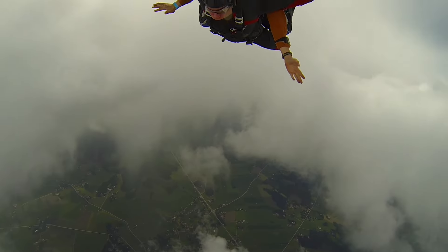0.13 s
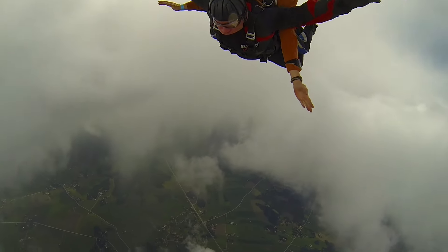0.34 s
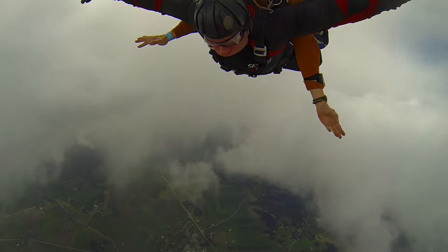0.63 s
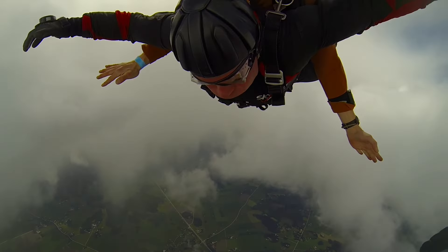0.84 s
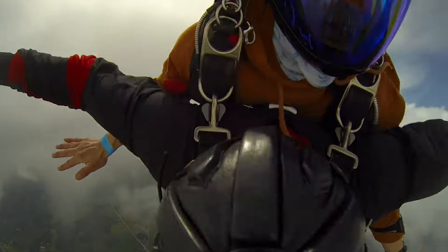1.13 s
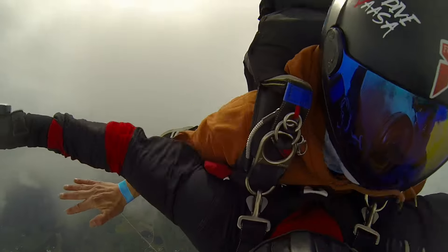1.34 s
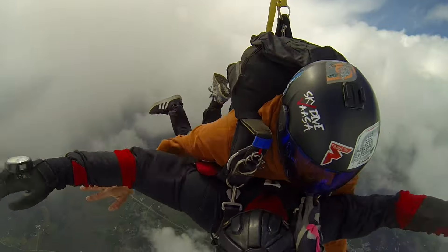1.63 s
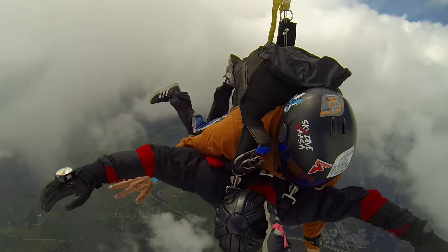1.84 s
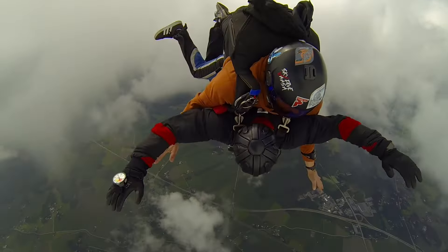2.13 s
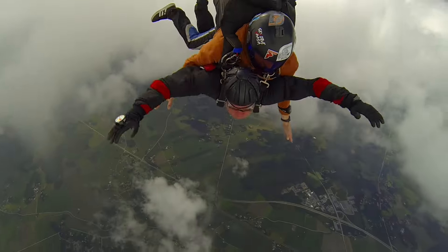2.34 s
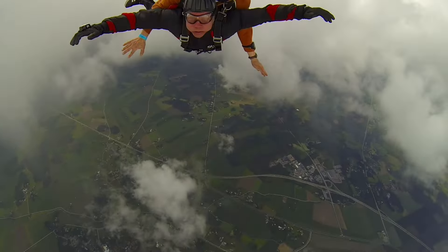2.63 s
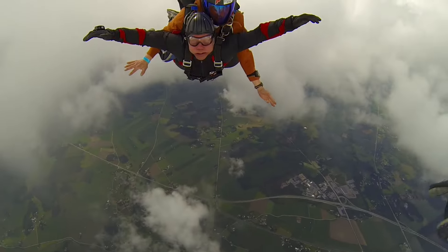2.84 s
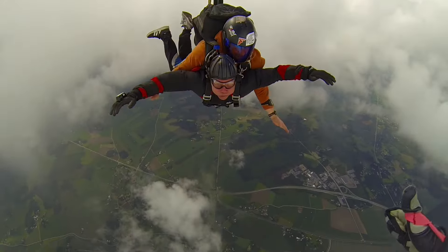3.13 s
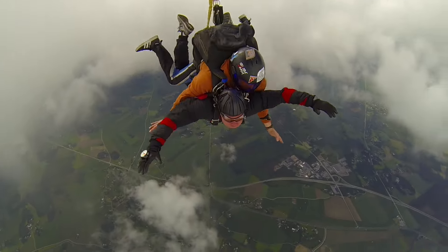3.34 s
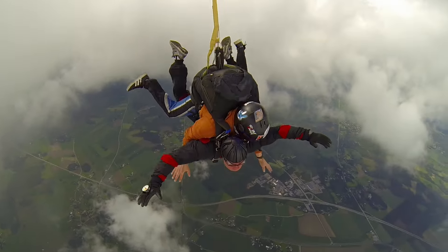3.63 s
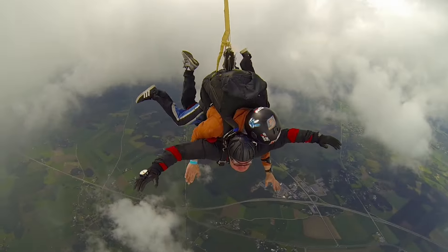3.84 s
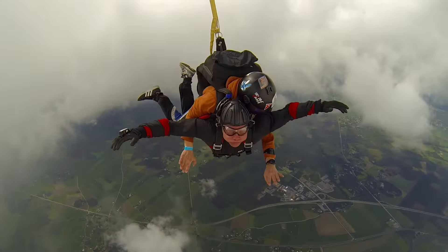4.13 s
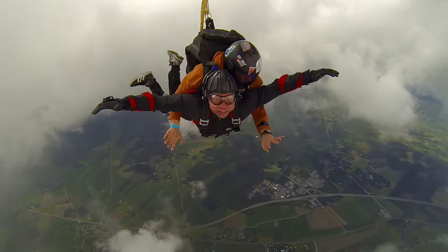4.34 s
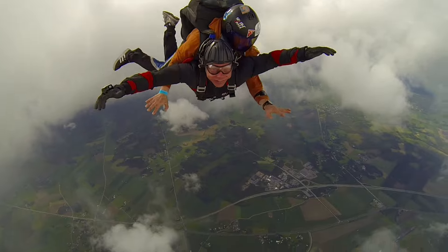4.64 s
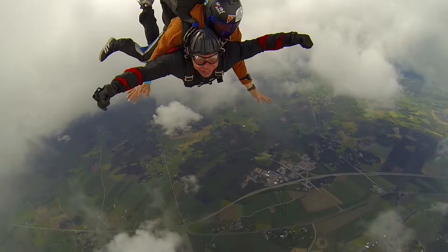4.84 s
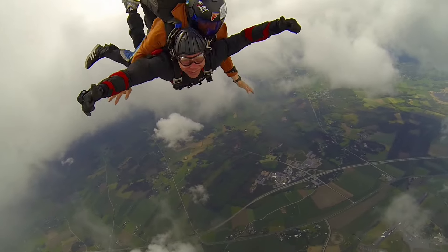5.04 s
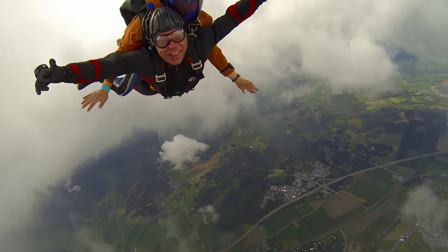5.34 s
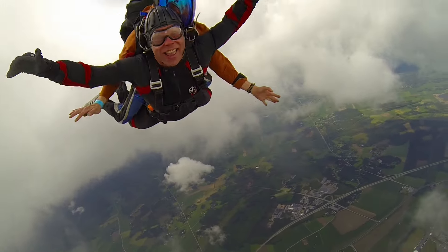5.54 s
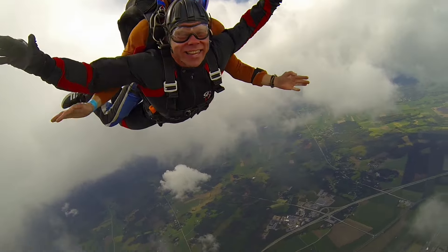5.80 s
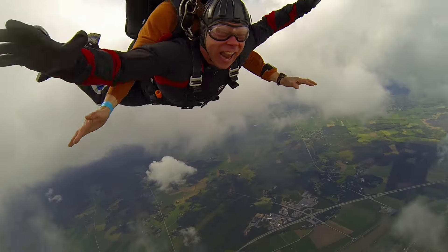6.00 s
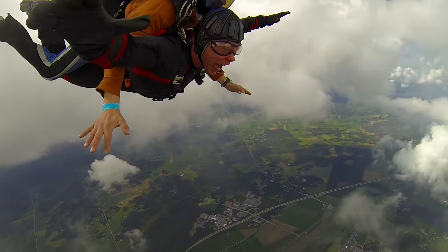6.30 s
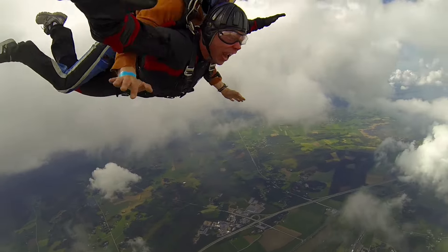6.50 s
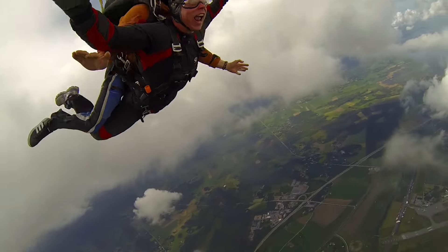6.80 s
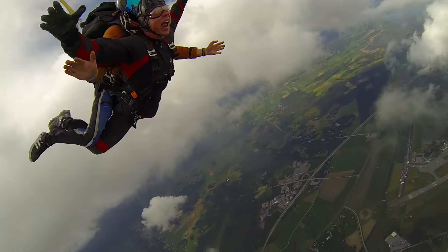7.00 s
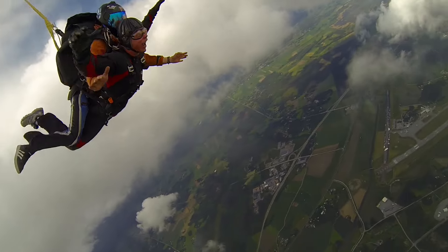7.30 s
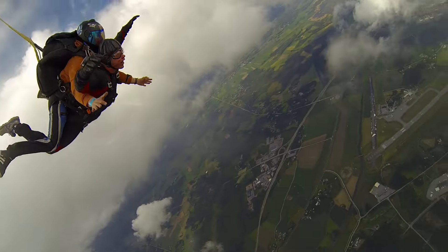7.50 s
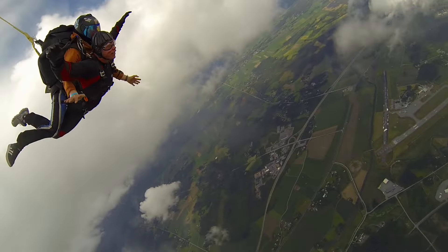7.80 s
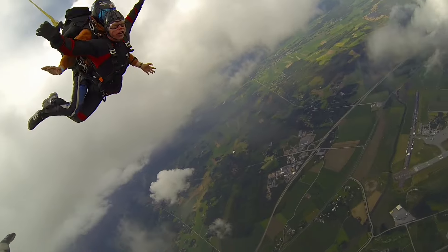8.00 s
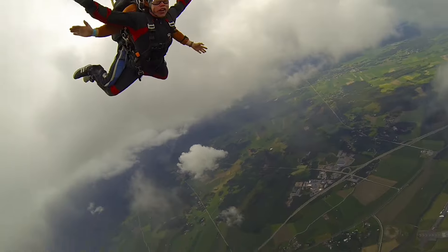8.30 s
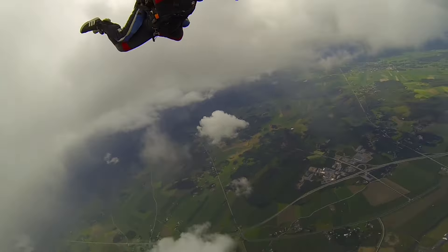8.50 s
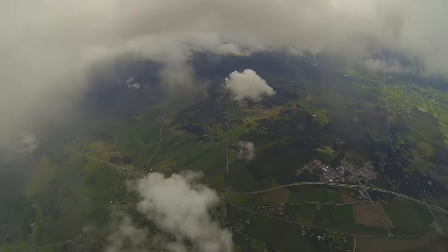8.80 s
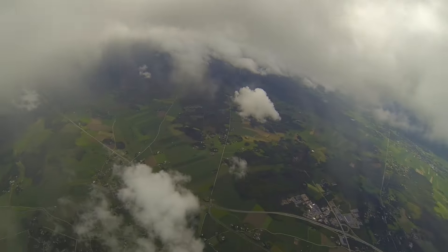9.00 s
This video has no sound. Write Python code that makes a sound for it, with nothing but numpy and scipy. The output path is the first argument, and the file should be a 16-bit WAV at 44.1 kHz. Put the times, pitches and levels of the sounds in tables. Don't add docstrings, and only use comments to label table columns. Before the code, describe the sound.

Loud, unbroken freefall wind roars over a small cased helmet camera, with low buffeting booms, a breathy mid-pitched howl and a few sharp slaps.

```python
import sys
import numpy as np
from scipy import signal
from scipy.fft import rfft, irfft
from scipy.io import wavfile
from scipy.ndimage import uniform_filter1d

SR = 44100
rng = np.random.default_rng(int(sys.argv[2]) if len(sys.argv) > 2 else 0)


def undo_db(level):
    steps = np.asarray(level, float) / 20
    return 10 ** steps


def store_wav(level_fs):
    pcm = np.round(np.clip(np.atleast_2d(level_fs), -1, 1) * 32767)
    wavfile.write(sys.argv[1], SR, pcm.T.astype(np.int16))


N = 403515

WAKE_DB, SHEAR_DB = -29, -37


def evened(x):
    return x / np.sqrt(np.mean(x ** 2) + 1e-20)


def flicker(fastest_hz):
    hz = np.fft.rfftfreq(N, 1 / SR)
    shape = (hz > 8) / np.sqrt(hz + 1) / (1 + (hz / fastest_hz) ** 2)
    return evened(irfft(rfft(rng.standard_normal(N)) * shape, N))


def turbulence(colour, patchy_db, size):
    frames = 4 * N // size + 5
    hz = np.fft.rfftfreq(size, 1 / SR)
    real, imaginary, patches = rng.standard_normal((frames, len(hz), 3)).T
    patches = uniform_filter1d(patches, size=8, axis=0)
    patches = evened(uniform_filter1d(patches, size=12, axis=1))
    colour_hz, colour_db = np.transpose(colour)
    shape_db = np.interp(np.log(hz + 1), np.log(colour_hz), colour_db, left=-90, right=-90)
    spectra = (real + 1j * imaginary) * undo_db(shape_db[:, None] + patchy_db * patches)
    return evened(signal.istft(spectra, nperseg=size, noverlap=size * 3 // 4)[1][:N])


def resonate(x, hz, width):
    turn = np.exp(2j * np.pi * np.cumsum(hz * np.ones(N)) / SR)
    r = np.exp(-np.pi * width / SR)
    return (turn * signal.lfilter([(1 - r) ** 2], [1, -2 * r, r * r], x / turn)).real


def mode(hz, width, db):
    return undo_db(db) * evened(resonate(rng.standard_normal(N), hz, width))


def steadied(x, span_s, share):
    span = round(span_s * SR)
    power = uniform_filter1d(uniform_filter1d(x ** 2, span), span)
    return evened(x / (abs(power) + 1e-12) ** (np.clip(share, 0, 1) / 2))


def drift(table, usual_db):
    return np.interp(np.arange(N) / SR, *np.transpose(table)) - usual_db


def passing(events):
    t = np.arange(0, N + 64, 64) / SR
    bells = sum(db * np.exp(-(2 * (t - s) / length) ** 2) for s, length, db in events)
    return np.interp(np.arange(N) / SR, t, bells)


# (frequency [Hz], density [dB per Hz])
BUFFET_COLOUR = [(12, -30), (22, -7), (40, -10), (60, -7.5), (110, -11.5), (160, -13.5), (260, -22),
                 (400, -54)]
# (frequency [Hz], width [Hz], level over the buffet [dB])
CASE_BOOM = (76.7, 26.7, -0.73)
# (time [s], level [dB])
WAKE = [(0.0, -29), (0.3, -26), (0.55, -23), (0.85, -31), (1.3, -24.5), (1.75, -26.5), (2.2, -30.5),
        (2.8, -34.5), (3.1, -31), (3.7, -31), (4.3, -29.5), (5.0, -29.5), (5.5, -26.5), (6.1, -28.5),
        (6.6, -28.5), (7.3, -26.5), (8.3, -22.5), (8.7, -29.5)]
# (time [s], length [s], level [dB])
EDDIES = [(0.36, 0.073, -2), (0.47, 0.074, 1.5), (0.62, 0.072, 1.5), (3.63, 0.052, -5), (0.94, .08, 3.5),
          (1.02, .07, -1), (1.09, .08, 1.5), (1.22, 0.051, 9), (1.27, 0.081, -3.5), (1.35, 0.1, 9.5),
          (1.43, 0.11, 0.5), (1.64, 0.068, 4), (1.84, 0.11, 2), (2.24, 0.057, 6), (2.37, 0.064, 7),
          (2.62, 0.15, 7), (2.85, 0.26, 10.5), (3.47, 0.075, 6), (3.56, 0.049, 6), (4.03, .1, 1),
          (4.55, 0.33, 0.5), (5.02, 0.087, 2), (5.38, 0.067, 4), (5.63, 0.11, 0.5), (5.72, 0.071, 2.5),
          (5.91, 0.14, 3.5), (6.79, 0.12, 5.5), (6.92, 0.047, 4), (7.1, 0.17, 2.5), (8.46, .09, 3.5)]


def buffet():
    thumps = turbulence(BUFFET_COLOUR, 0.73, size=4096) + mode(*CASE_BOOM)
    level_db = WAKE_DB + drift(WAKE, WAKE_DB) + passing(EDDIES) + 0.69 * flicker(18)
    return undo_db(level_db) * steadied(thumps, 0.068, 0.25)


# (frequency [Hz], density [dB per Hz])
ROAR_COLOUR = [(90, -17), (200, -2), (330, 0.5), (480, -2), (600, -5), (760, -3.5), (930, -1), (1010, -8.5),
               (1300, -1)]
# (time [s], level [dB])
SHEAR = [(0.0, -36), (0.15, -37.5), (0.56, -36), (0.85, -38.5), (1.3, -40), (1.5, -39), (1.8, -38),
         (2.2, -36), (2.85, -33.5), (3.05, -35.5), (3.7, -38.5), (4.3, -35.5), (5.15, -36.5), (5.35, -36.5),
         (6.7, -36.5), (7.5, -27.5), (8.08, -29.5), (8.5, -35)]
# (time [s], length [s], level [dB])
LIFTS = [(0.36, 0.078, -4), (0.6, .06, 2), (0.645, 0.035, -1.5), (0.84, 0.11, -2.5), (1.02, .1, -1),
         (1.1, 0.23, -4.5), (1.28, .11, -5.5), (1.365, 0.053, -7), (1.63, 0.058, 2.5), (1.74, .15, -1.5),
         (2.46, 0.088, -2), (2.88, 0.13, 3.5), (2.95, 0.052, -3), (3.06, 0.053, -2), (3.41, .1, -0.5),
         (3.59, .06, 2.5), (4.71, 0.054, -1.5), (4.94, 0.088, -2.5), (5.45, 0.084, 4), (5.67, 0.095, -4),
         (5.81, 0.063, -2.5), (6.17, 0.067, -0.5), (6.83, 0.053, 5.5), (6.9, 0.17, -4), (8.36, 0.071, -6),
         (8.57, 0.053, 0.5), (8.82, 0.06, 2.5), (8.95, 0.032, -2.5), (9.05, 0.054, -4.5),
         (9.15, 0.085, -5.5)]
# (time [s], length [s], level [dB])
SHEETS = [(0.5, .15, 1.5), (0.78, .08, -1), (0.97, .06, 2), (1.08, .14, 3), (1.18, 0.088, 2.5),
          (1.25, .05, -1), (1.47, .08, 3), (1.37, 0.028, -6), (1.68, .05, 3.5), (2.14, .1, 1),
          (2.45, 0.14, -2.5), (2.96, 0.11, -3.5), (3.34, 0.23, 1), (4.0, .15, 0.5), (5.35, .1, 3.5),
          (5.47, 0.091, -0.5), (5.68, .1, 1), (5.8, .05, -1.5), (5.91, .05, 3), (5.95, .04, -0.5),
          (6.09, .1, 2), (6.24, .06, 1), (6.41, .1, -2), (6.62, 0.14, -1.5), (7.05, 0.4, 1),
          (7.57, .06, -1), (8.42, 0.088, 0), (8.6, 0.15, -3), (8.8, 0.11, 1.5), (9.1, 0.44, -3.5)]


def roar(gusts):
    slow_db = 0.79 * drift(WAKE, WAKE_DB) + 0.068 * drift(SHEAR, SHEAR_DB)
    quick_db = 0.71 * passing(EDDIES) + 0.34 * passing(LIFTS) + 0.4 * passing(SHEETS)
    level_db = -35.0 + slow_db + uniform_filter1d(quick_db, size=3000)
    return undo_db(level_db + 0.5 * gusts) * steadied(turbulence(ROAR_COLOUR, 1.0, size=1024), 0.13, 0.2)


# (frequency [Hz], density [dB per Hz])
HISS_COLOUR = [(1200, -39), (1800, -10.5), (2200, -6), (2600, -6.5), (3250, -8.5), (3900, -17.5),
               (4500, -15.5), (5600, -19.5), (7700, -27.5), (9000, -36), (11500, -37.5), (12300, -37.5),
               (14300, -44), (15300, -49)]
# (frequency [Hz], width [Hz], level against the hiss [dB])
PANELS = [(763, 270, -7), (3096, 260, -9.5), (4863, 340, -16.5), (8250, 500, -29.5), (10160, 1900, -25),
          (13500, 1500, -31)]


def hiss(gusts):
    shear_db = drift(SHEAR, SHEAR_DB)
    fine = turbulence(HISS_COLOUR, 0.75, size=512)
    fine = fine + sum(mode(hz * (1 + 0.0027 * shear_db), width, db + 0.19 * shear_db)
                      for hz, width, db in PANELS)
    passing_db = 0.62 * passing(LIFTS) - 0.018 * passing(EDDIES) + passing(SHEETS)
    return undo_db(SHEAR_DB + 0.4 + shear_db + passing_db + 0.57 * gusts) * fine


# (time [s], peak level [dB])
SLAPS = [
    (0.754, -15),
    (0.9986, -6),
    (1.487, -17),
    (3.2929, -13),
    (4.9147, -10),
    (6.824, -17),
    (8.515, -9),
    (8.7096, -24),
]


def slaps(hz=1370, rise_s=0.0023):
    hits, t = np.zeros(N), np.arange(600) / SR
    for s, db in SLAPS:
        hits[round(s * SR)] = undo_db(db - 1.5)
    ring = t / rise_s * np.exp(1 - t / rise_s) * np.sin(2 * np.pi * hz * t)
    return signal.oaconvolve(hits, ring)[:N]


# (factor on port pitch, width [Hz], level [dB])
PORT = [(0.963, 326, 10.5), (1.098, 410, 4.5), (1.38, 650, -4.5)]
# (frequency [Hz], width [Hz], level against the howl [dB])
WALL_RING = (450.6, 115, -20.5)


def howl(gusts):
    shear_db = drift(SHEAR, SHEAR_DB)
    port_hz = 1366 + 2.5 * shear_db
    cavity = np.zeros(N)
    for factor, width, db in PORT:
        favour = 5.5 * np.sin(np.pi * (factor - 1) / 0.33) / 10
        cavity = cavity + mode(port_hz * factor, width, db + favour * shear_db)
    cavity = signal.sosfilt(signal.butter(4, 1080, "high", fs=SR, output="sos"), cavity)
    level_db = -20 - 0.053 * drift(WAKE, WAKE_DB) + 0.0024 * shear_db + passing(LIFTS)
    return undo_db(level_db + 0.49 * gusts) * (steadied(cavity, 0.071, 1.0) + mode(*WALL_RING))


def scene():
    gusts = flicker(81)
    return (buffet() + roar(gusts) + hiss(gusts) + slaps() + howl(gusts))[None]


def low_pass(x):
    return signal.sosfilt(signal.butter(12, 15320, fs=SR, output="sos"), x)


def record(dry):
    peak_db = 20 * np.log10(abs(dry[0]) + 1e-9)
    fall = np.arange(N) * 58.0 / SR
    held_db = np.maximum.accumulate(peak_db + fall) - fall
    over_db = np.maximum(held_db + 11.0, 0)
    late_db = signal.lfilter([0.012], [1, 0.012 - 1], over_db)
    mix = dry / undo_db(0.6 * late_db - 0.14)
    return low_pass(mix)


dry = scene()
out = record(dry)
store_wav(out)
```